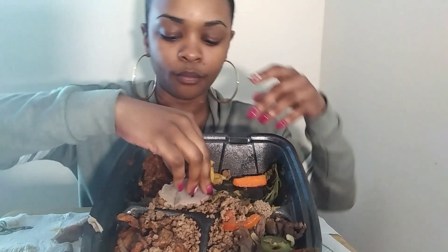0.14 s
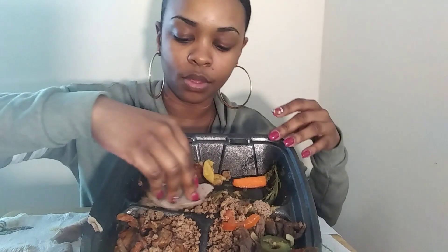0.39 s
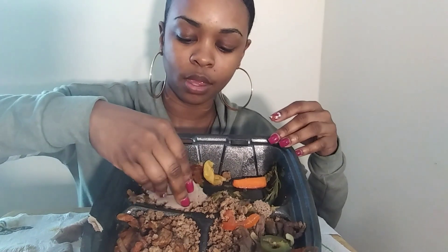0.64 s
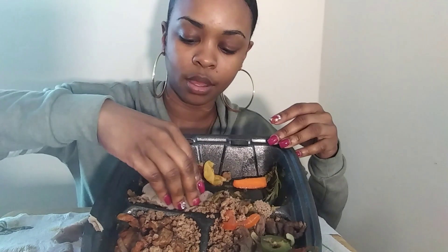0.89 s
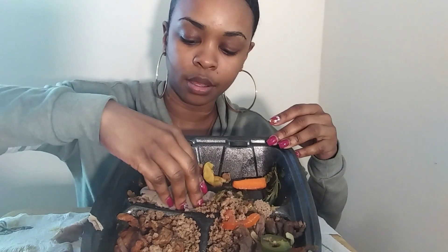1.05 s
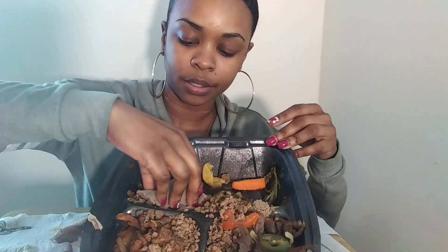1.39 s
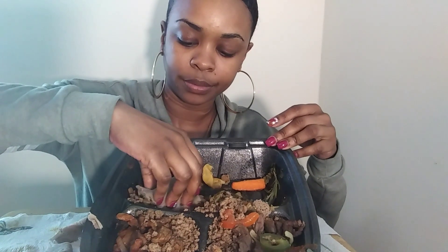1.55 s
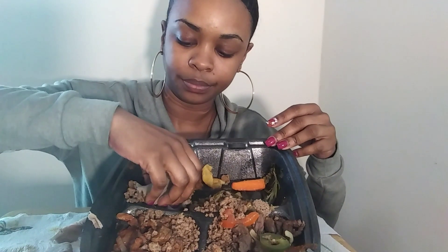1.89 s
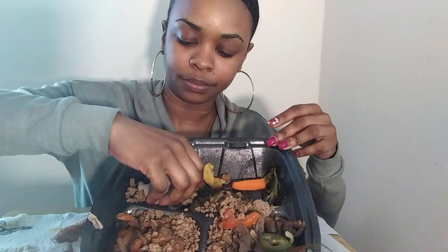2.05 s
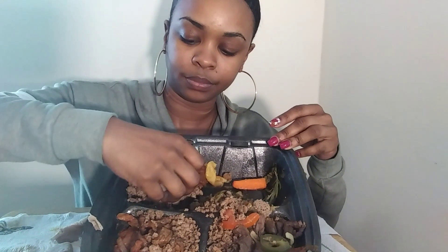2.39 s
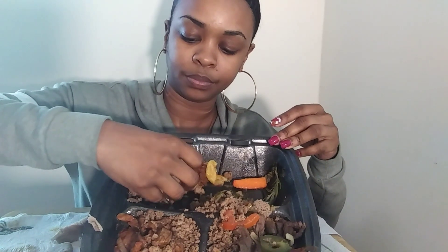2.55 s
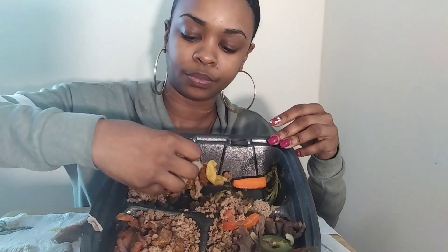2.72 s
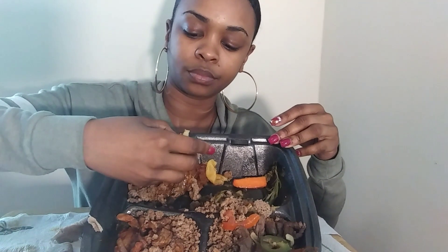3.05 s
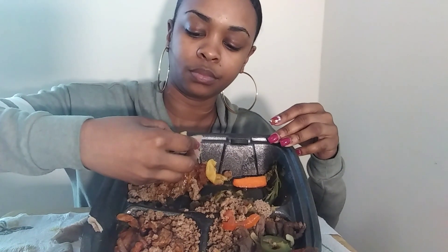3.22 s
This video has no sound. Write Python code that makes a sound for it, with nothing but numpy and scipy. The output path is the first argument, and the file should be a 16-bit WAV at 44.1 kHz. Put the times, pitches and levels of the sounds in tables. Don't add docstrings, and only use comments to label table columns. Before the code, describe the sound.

A plastic food tray snaps and creaks under fingers tearing soft bread: faint rustles and one hard nail tap first, then crackling bursts, then a soft wet squelch. Small room, close small microphone, faint hum and hiss.

```python
import sys
import numpy as np
from scipy import signal
from scipy.fft import rfft, irfft
from scipy.io import wavfile
from scipy.ndimage import uniform_filter1d

SR = 44100
rng = np.random.default_rng(int(sys.argv[2]) if len(sys.argv) > 2 else 0)


def output_pcm(signal):
    pcm = np.clip(np.atleast_2d(signal).T, -1, 1) * 32767
    wavfile.write(sys.argv[1], SR, np.round(pcm).astype(np.int16))


def volts(x):
    e = np.asarray(x, float) / 20
    return 10 ** e


N = 149940


def evened(x):
    return x / np.sqrt(np.mean(x ** 2) + 1e-20)


def read(points, hz):
    f, value = np.transpose(points)
    return np.interp(np.log(hz + 1), np.log(f + 1), value)


def add(mix, s, sound):
    part = mix[..., round(s * SR):][..., :sound.shape[-1]]
    part += sound[..., :part.shape[-1]]


def slow(top_hz):
    t = np.arange(N) / SR
    rates = top_hz * np.geomspace(.05, 1, 16)
    return evened(sum(np.sin(2 * np.pi * (f * t + rng.random())) / np.sqrt(f) for f in rates))


def colour(x, tone, tilt_db=0.):
    hz = abs(np.fft.fftfreq(2048, 1 / SR))
    db = read(tone, hz) + tilt_db * np.log2(np.clip(hz, 250, 16000) / 2000)
    log_gain = np.log(volts(np.maximum(db, -100)))
    phase = -signal.hilbert(log_gain).imag
    taps = np.fft.ifft(np.exp(log_gain + 1j * phase)).real[:1024]
    return signal.fftconvolve(x, taps)[:len(x)]


# (frequency [Hz], level [dB rms])
HUM = [(236.9, -59), (360.7, -68.5), (769.8, -80), (1362, -79.5)]


def hum():
    out = np.zeros(N)
    for hz, db in HUM:
        level = np.sqrt(2) * volts(db + 1.5 * slow(7.8))
        turns = np.cumsum(hz + 0.99 * slow(4.8)) / SR
        out += level * np.sin(2 * np.pi * turns)
    return out


# (frequency [Hz], density [dB per Hz])
HISS_TONE = [(100, -29.5), (240, -4), (360, -5.5), (500, -11.5), (4000, -28), (6200, -35.5), (10000, -31.5),
             (15800, -33.5)]
# (frequency [Hz], density [dB per Hz])
RUMBLE_TONE = [(20, -6.5), (130, 8), (200, -12), (400, -25)]


def hiss(shake):
    hz = np.fft.rfftfreq(N, 1 / SR)
    air, low = (evened(irfft(rfft(rng.standard_normal(N)) * volts(read(tone, hz)), N))
                for tone in (HISS_TONE, RUMBLE_TONE))
    shaking = uniform_filter1d(abs(shake), size=2000)
    swell = volts(-91.5 + 4 * slow(4.1)) * (1 + 580 * shaking)
    return volts(-62 + 0.79 * slow(6.0)) * air + swell * low


# (time [s], level [dB])
RUSTLE = [(0, -61), (.3, -61.5), (.65, -56.5), (.8, -61), (1.1, -62.5), (1.4, -63.5), (1.7, -62),
          (2.1, -58), (2.6, -60), (2.85, -61.5), (3.1, -63), (3.4, -61.5)]
# (frequency [Hz], density [dB per Hz])
RUSTLE_TONE = [(250, 0.5), (600, 2), (2000, 0.5), (4500, -7.5), (7000, -52), (10000, -11.5), (15000, -16)]


def rustle():
    grains_per_s, spread_db, puff_s = 360, 3, 0.0016
    size = volts(spread_db * np.minimum(rng.exponential(1, N), 2.5))
    grains = size * (rng.random(N) < grains_per_s / SR)
    puffs = signal.lfilter([1], [1, -np.exp(-1 / (puff_s * SR))], grains)
    level_db = np.interp(np.arange(N) / SR, *np.transpose(RUSTLE)) - 11
    return volts(level_db) * evened(colour(puffs * rng.standard_normal(N), RUSTLE_TONE))


def ringing(body, pitch, vary_db):
    t = np.arange(3072) / SR
    level_spread, pitch_spread = rng.standard_normal((2, 6))
    out = 0 * t
    for k, (hz, width, db) in enumerate(body):
        level = volts(db + vary_db * level_spread[k]) * np.sqrt(width)
        mode_hz = hz * (pitch + 0.0021 * pitch_spread[k])
        out += level * np.exp(-np.pi * width * t) * np.sin(2 * np.pi * mode_hz * t)
    return out


def click(tone, body, tilt_db=0., pitch=1., ring=.3, vary_db=2.1,
          burst_s=0.003, rough=0.55, rise_s=.0009, count=1):
    t = np.arange(3072) / SR
    shape = np.exp(-t / burst_s) * np.minimum(t / rise_s, 1) ** 2
    burst = rough * rng.standard_normal(3072) * shape
    burst[round(.0009 * SR)] -= 1
    for _ in range(count):
        z = rfft(burst)
        burst = irfft(z / abs(z)) * np.sqrt(shape)
    crack = colour(burst, tone, tilt_db)
    crack = crack / np.linalg.norm(crack)
    out = np.array([crack, 0 * t])
    if body:
        modes = signal.fftconvolve(ringing(body, pitch, vary_db), burst[:200])[:len(t)]
        modes = modes / np.linalg.norm(modes)
        out = np.array([np.sqrt(1 - ring) * crack, np.sqrt(ring) * modes])
    return out / abs(out.sum(0)).max()


def clicks(events, tone, body=(), **feel):
    out = np.zeros((2, N))
    for s, db, *tilt_and_pitch in events:
        add(out, s, volts(db) * click(tone, body, *tilt_and_pitch, **feel))
    return out


# (time [s], peak
# level [dB], brightness [dB per octave])
BRUSHES = [(.205, -76, 14), (.312, -47, 1.5), (.33, -49.5, -3.5), (.378, -47, -2.5), (.41, -55.5, 9.5),
           (.44, -56, 8.5), (.47, -52.5, 7.5), (.455, -54, 11), (.49, -58, 7), (.505, -60, 9),
           (.625, -53, 2), (.72, -63, -5), (1.08, -52, -4.5), (1.13, -48, 0), (1.275, -51.5, -0.5),
           (2.135, -49, -6), (3.2, -58, -2), (3.082, -52, 10), (3.215, -60, 6)]
# (frequency [Hz], density [dB per Hz])
FOOD_TONE = [(250, -25), (420, 4.5), (900, -1.5), (2600, -8), (4500, -19), (6000, -25), (10000, -30),
             (15500, -59)]


def brushes():
    return clicks(BRUSHES, FOOD_TONE, burst_s=0.0057, rough=1.1, rise_s=0.0096, count=0)


# (time [s], peak level [dB], pitch [Hz])
THUDS = [(0.215, -49, 362), (0.315, -47, 361), (0.39, -46.5, 456), (0.636, -50, 417), (1.457, -54, 533),
         (2.154, -50, 390), (2.574, -43, 425), (2.876, -54, 358), (2.921, -58, 380), (3.015, -53, 374),
         (3.034, -47.5, 364), (3.17, -50, 432), (3.186, -45, 560), (3.222, -57, 345), (3.295, -61, 376)]


def thuds():
    out, t = np.zeros(N), np.arange(2048) / SR
    swell_s = 0.0045
    shape = np.e * t / swell_s * np.exp(-t / swell_s)
    for s, db, hz in THUDS:
        add(out, s, volts(db - 4.5) * shape * np.sin(2 * np.pi * hz * t))
    return out


# (time [s], peak level [dB], brightness [dB per octave])
TICKS = [(.326, -46, -1), (.396, -49, -1), (0.561, -46, -0.5), (0.6295, -40.5, -2.5), (0.639, -54, -4),
         (0.878, -49.5, -3), (1.069, -50.5, -4), (1.088, -48, -2), (1.136, -45, -3), (1.295, -55.5, 12),
         (1.458, -43, -2), (2.0464, -38.5, 1), (2.0559, -40, 0.5), (2.0668, -37.5, 1.5), (2.0757, -50, 0),
         (2.0847, -48, 0), (2.1032, -46, 0), (2.1198, -38.5, 2), (2.1269, -39, 0), (2.1318, -47, 0),
         (2.1359, -44, 2), (2.1396, -46, 0.5), (2.1426, -42, -1.5), (2.151, -47, -3), (2.156, -50, -2),
         (2.365, -43, 3)]


def ticks():
    return clicks(TICKS, FOOD_TONE, burst_s=0.0026, count=0)


# (time [s], length [s], level [dB], start pitch [Hz], end pitch [Hz])
SQUEAKS = [
    (.5605, .005, -54, 1100, 1250),
    (2.1722, .003, -52, 4350, 4700),
    (2.876, .0015, -60, 7600, 8800),
    (2.911, .0012, -67, 8000, 9000),
    (3.0935, .0115, -35.5, 600, 670),
    (3.1035, .012, -37, 760, 830),
    (3.117, .012, -49, 740, 700),
]


def squeaks():
    out = np.zeros(N)
    for s, length, db, from_hz, to_hz in SQUEAKS:
        u = np.arange(0, 1, 1 / (length * SR))
        turns = np.cumsum(from_hz + (to_hz - from_hz) * u) / SR
        flutter = 1 + 0.37 * np.sin(2 * np.pi * 110 * u * length)
        add(out, s, volts(db) * np.sin(np.pi * u) * flutter * np.sin(2 * np.pi * turns))
    return out


# (time [s], peak level [dB])
NAIL = [
    (.8207, -18),
]
# (frequency [Hz], width [Hz], level [dB])
NAIL_BODY = [(2670, 250, 1.5), (4160, 250, 7)]
# (frequency [Hz], density [dB per Hz])
NAIL_TONE = [(900, -41), (1900, -1.5), (4200, -3.5), (5300, -18.5), (6900, -6.5), (8000, -18),
             (10500, -1.5), (15500, -41)]


def nail():
    return clicks(NAIL, NAIL_TONE, NAIL_BODY, ring=0.35, rough=0.3, burst_s=0.0014, count=4)


# (time [s], peak level [dB], brightness [dB per octave], rim pitch [ratio])
SNAPS = [(1.4948, -37.5, -0.8, 0.86), (1.5208, -29, 4.5, 1.06), (1.5305, -31, -7.5, .95),
         (2.2306, -25, 2, 0.79), (2.2396, -23.5, -2.8, 0.94), (2.2436, -22, 1, 0.84),
         (2.2487, -41, -4, 1.1), (2.2639, -17.5, 1.7, 0.96), (2.3946, -18, 1.2, 1.12),
         (2.404, -32.5, -0.5, 0.75), (2.4266, -20, 1.2, 1.03), (2.46, -22.5, 1, 0.98),
         (2.5124, -36, 0.5, 0.93), (2.5735, -24.5, 1, 0.96), (2.609, -24.5, 0.4, 1.01),
         (2.643, -23.5, 1.5, 1.02), (2.7065, -29, -0.5, 1.17), (2.7087, -34, -4, 0.73),
         (3.189, -32, 3, 1.13)]
# (frequency [Hz], width [Hz], level [dB])
SNAP_BODY = [(499, 96, 16), (731, 43, 15), (933, 31, 12), (1370, 49, 12.5), (2810, 230, 24),
             (3340, 290, 26)]
# (frequency [Hz], density [dB per Hz])
SNAP_TONE = [(250, -18.5), (420, -5), (1150, -5.5), (1600, -8), (2570, -7), (5390, -16.5), (9850, -21.5),
             (15500, -36)]


def snaps():
    return clicks(SNAPS, SNAP_TONE, SNAP_BODY, vary_db=1.5, ring=0.36, burst_s=0.0037, rough=.8)


# (time [s], peak level [dB], brightness [dB per octave], wall pitch [ratio])
RIPS = [(1.5352, -35, 3, 1.2), (1.5396, -30, 1.5, 1.01), (1.5426, -31, -1, 1.14), (1.545, -27.5, 1.5, 0.96),
        (1.5495, -26.5, -2, 0.93), (1.5532, -25, -0.5, 0.93), (1.5567, -30.5, -1.5, 1.2),
        (1.5603, -27, -1.5, 0.8), (1.5637, -30.5, -0.5, 1.13), (1.5665, -27, .1, .96),
        (1.5698, -29, 2.5, 0.94), (1.5727, -32, -1, 0.94), (1.5756, -33, 1, .87), (1.5785, -31, -1, 0.81),
        (1.5825, -34.5, -2, 0.86)]
# (frequency [Hz], width [Hz], level [dB])
RIP_BODY = [(597, 620, -1), (2540, 160, 11), (4000, 260, 0)]
# (frequency [Hz], density [dB per Hz])
RIP_TONE = [(250, -36), (450, -4), (1500, -11), (2500, -2.5), (4300, -9), (5600, -16), (9500, -18.5),
            (15500, -47)]


def rips():
    return clicks(RIPS, RIP_TONE, RIP_BODY, ring=0.33, burst_s=0.0027, rough=0.5)


# (time [s], peak level [dB])
CREAKS = [(1.8081, -25), (1.8097, -27.5), (1.8114, -27.5), (1.813, -48), (1.8166, -26.5), (1.8181, -29),
          (1.8375, -25), (1.8406, -25.5), (1.8435, -26.5), (1.8461, -26), (1.8683, -22.5), (1.8703, -28),
          (1.8727, -27), (1.8755, -23.5), (1.8805, -31), (1.8774, -45), (1.9069, -24), (1.9086, -28),
          (1.9106, -28), (1.9236, -24.5), (1.9256, -36), (1.9289, -25), (1.9311, -24.5), (1.9345, -27),
          (1.9375, -32), (1.9416, -37)]
# (frequency [Hz], width [Hz], level [dB])
CREAK_BODY = [(463, 210, 1), (1196, 23, 5), (1570, 120, 8.5), (2075, 65, 17), (2480, 74, -20),
              (3230, 240, 4.5)]
# (frequency [Hz], density [dB per Hz])
CREAK_TONE = [(250, -14.5), (420, -2.5), (900, -9.5), (2100, -2), (4000, -8.5), (5500, -22), (9500, -22),
              (15500, -37)]


def creaks():
    return clicks(CREAKS, CREAK_TONE, CREAK_BODY, ring=0.48, burst_s=0.0018, rough=.6)


# (time [s], peak level [dB])
LUMP = [
    (3.0827, -43.5),
    (3.0867, -40.5),
    (3.0885, -40),
    (3.0954, -37.5),
    (3.0996, -47),
    (3.1045, -42),
]
# (frequency [Hz], width [Hz], level [dB])
LUMP_BODY = [(890, 300, 17), (1400, 550, 33), (2370, 780, -3)]


def lump():
    return clicks(LUMP, FOOD_TONE, LUMP_BODY, ring=0.37)


def scatter(x):
    t = np.arange(1024) / SR
    bright = signal.butter(1, 1490, "high", fs=SR, output="sos")
    bounces = signal.sosfilt(bright, rng.standard_normal(1024)) * t * np.exp(-t / 0.0035)
    return signal.fftconvolve(x, volts(-10) * bounces / np.linalg.norm(bounces))[:N]


# (delay [s], level [dB])
ECHOES = [
    (.0088, -10),
    (.0104, -12),
    (.0175, -18),
]


def echoes(x):
    dull = signal.sosfilt(signal.butter(2, 3900, fs=SR, output="sos"), x)
    out = np.zeros(N)
    for s, db in ECHOES:
        add(out, s, volts(db) * dull)
    return out


# (frequency [Hz], t60 [s])
ROOM = [(300, 0.24), (800, 0.22), (2100, 0.18), (4000, 0.22), (7000, 0.18), (12000, 0.16)]


def room(x):
    turn = np.pi * np.arange(N) / SR / .07
    out = x + scatter(x) + echoes(x)
    for weight in (np.sin(turn), np.cos(turn)):
        hz, t, z = signal.stft(rng.standard_normal(SR // 2), SR, nperseg=128)
        tail = signal.istft(z * volts(-60 * t / read(ROOM, hz)[:, None]), SR, nperseg=128)[1]
        tail = tail * np.clip(np.arange(len(tail)) / SR / .007, 0, 1) ** 2
        out += signal.fftconvolve(x * weight, volts(-6) * tail / np.linalg.norm(tail))[:N]
    return out


def scene():
    ring_wet, squeak_wet = 0.3, 0.25
    tray = creaks() + snaps() + rips() + lump()
    hand = nail() + ticks() + brushes()
    broad, rings = tray + hand
    soft = squeaks() + thuds()
    reflected = room(broad + ring_wet * rings + squeak_wet * soft + rustle())
    near = reflected + (1 - ring_wet) * rings + (1 - squeak_wet) * soft
    bass_cut = signal.butter(4, 270, "high", fs=SR, output="sos")
    return (signal.sosfilt(bass_cut, near) + hum() + hiss(broad))[None]


def roll_off(x):
    return signal.sosfilt(signal.butter(12, 16450, fs=SR, output="sos"), x)


def record(dry):
    limited = signal.oaconvolve(dry, signal.firwin(255, 15750, fs=SR)[None], "same")
    return roll_off(limited)


dry = scene()
out = record(dry)
output_pcm(out)
```